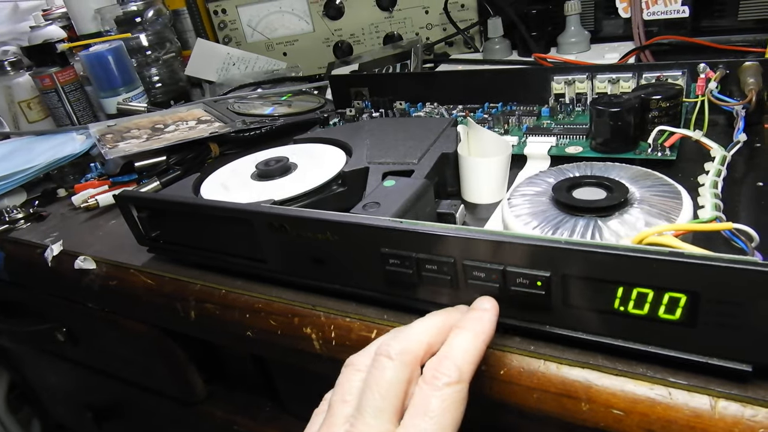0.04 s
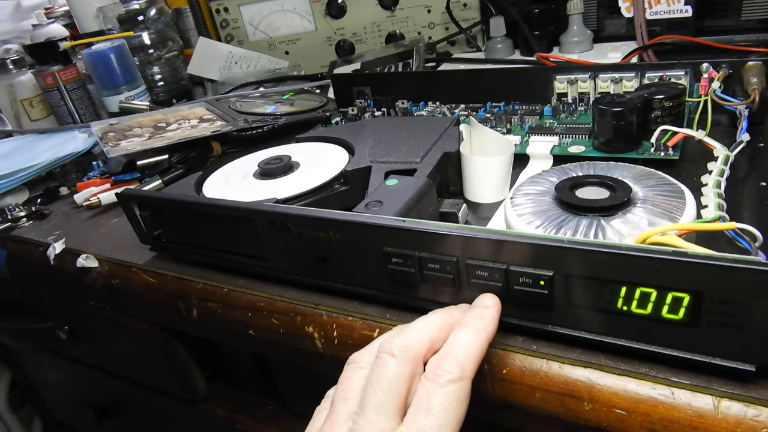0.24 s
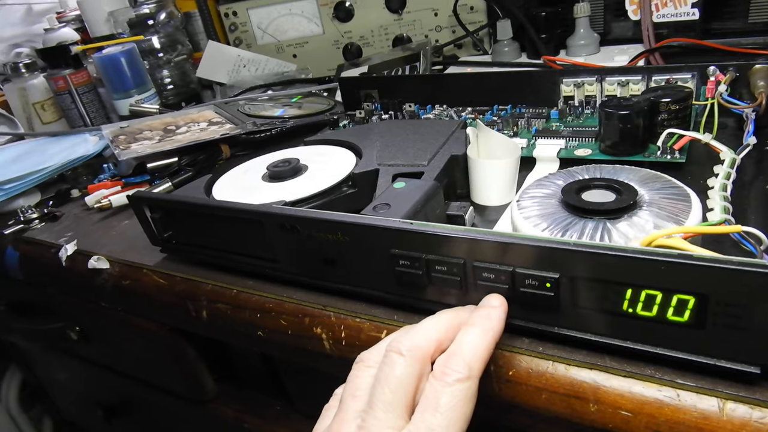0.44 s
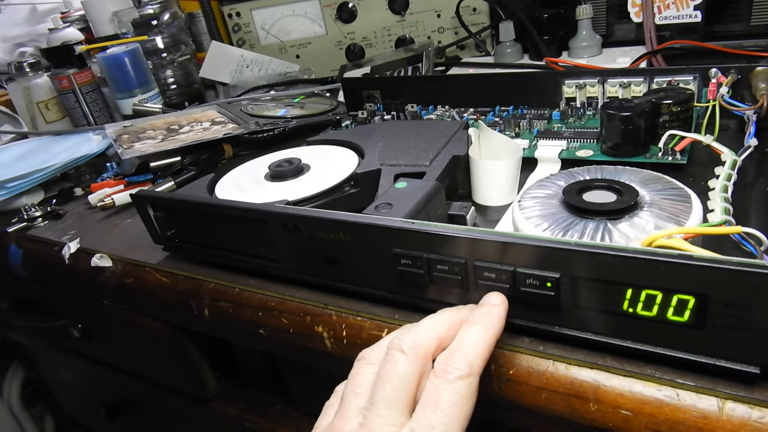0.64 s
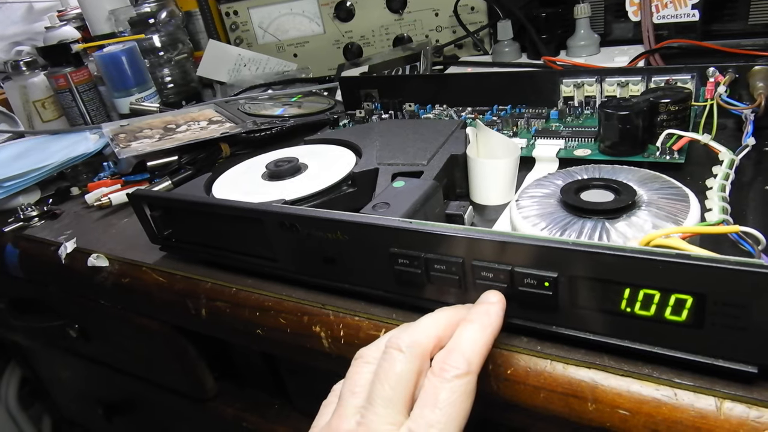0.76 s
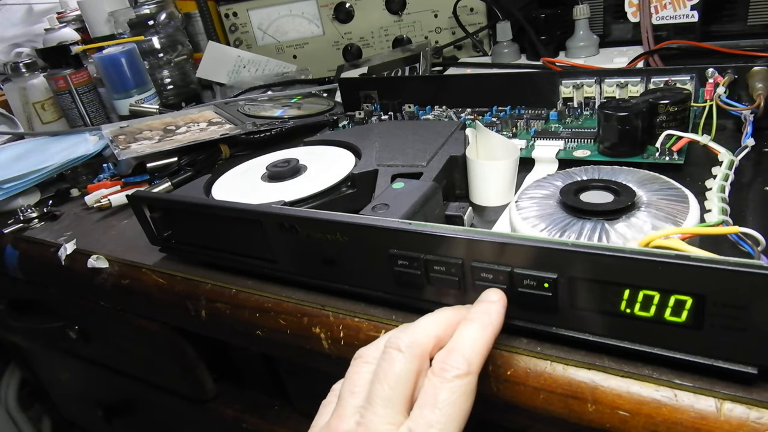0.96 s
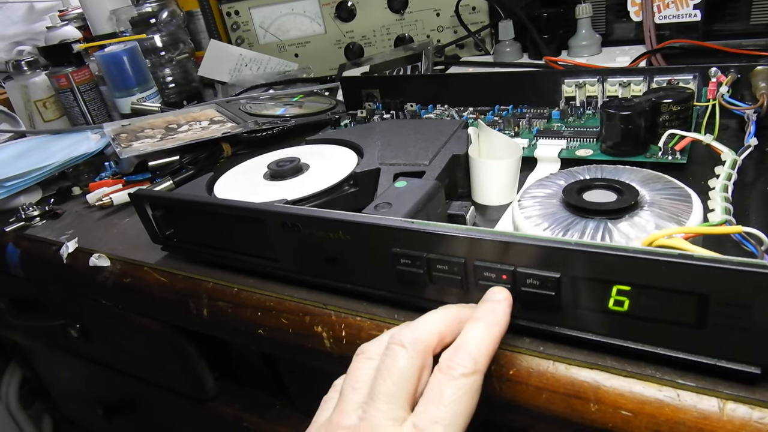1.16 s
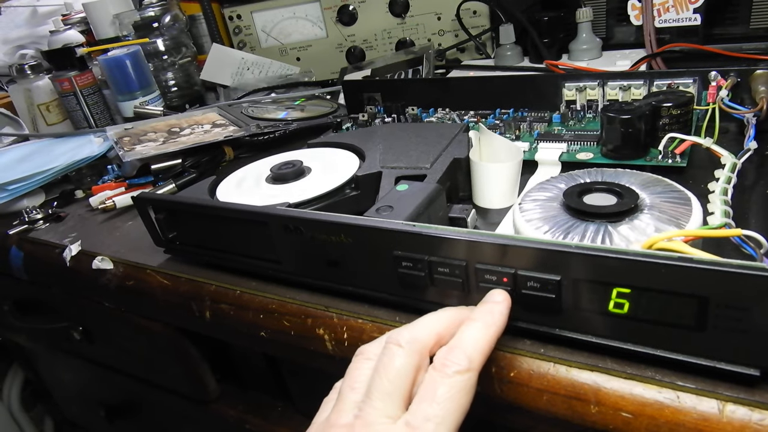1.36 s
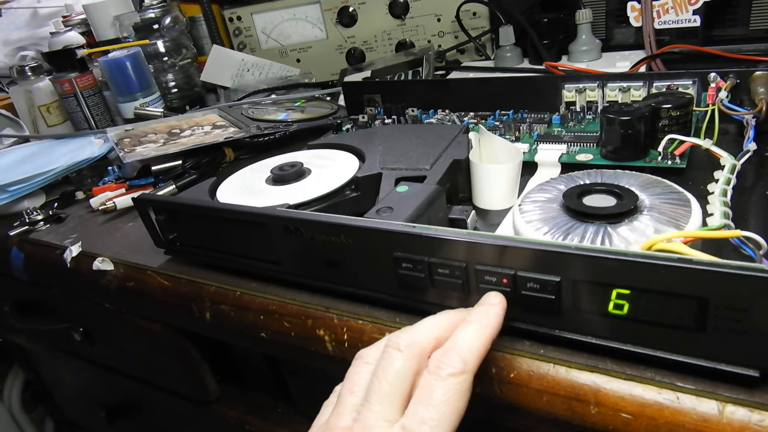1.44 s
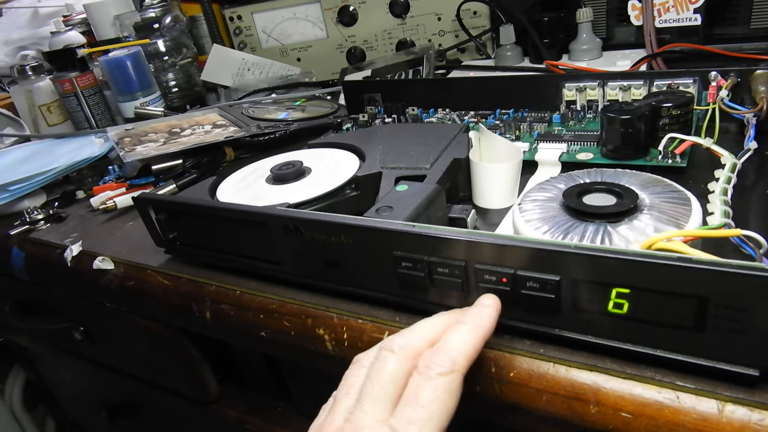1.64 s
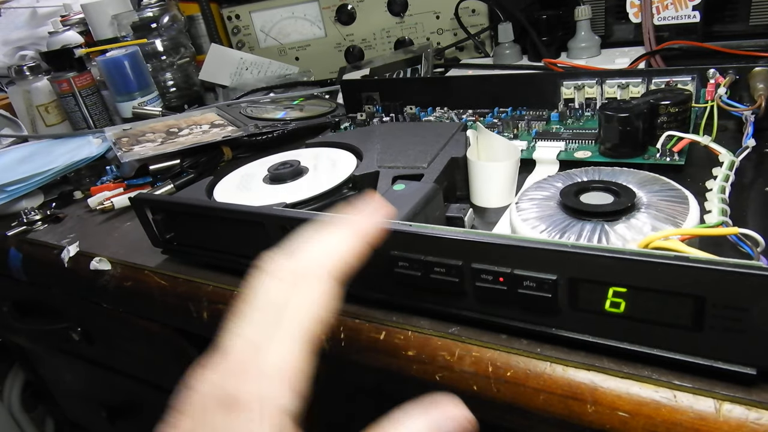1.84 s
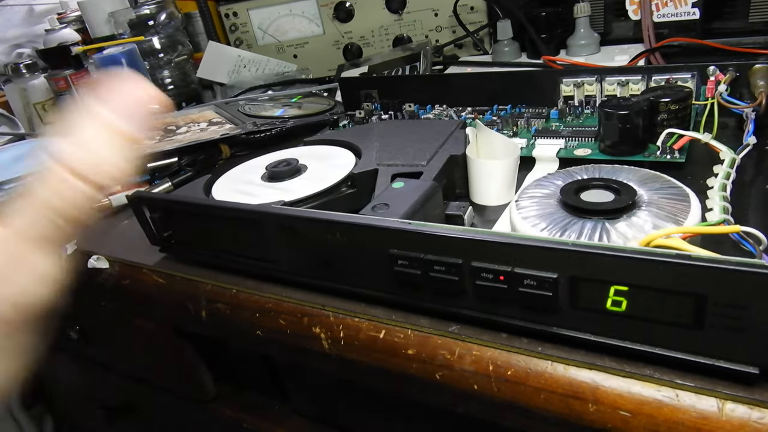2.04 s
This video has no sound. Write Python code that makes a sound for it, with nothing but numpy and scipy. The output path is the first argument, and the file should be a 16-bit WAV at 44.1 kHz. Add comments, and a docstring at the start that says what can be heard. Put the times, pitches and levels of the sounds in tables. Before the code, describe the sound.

Throbbing metallic hiss of a slipping disc, after soft scuffs and clicks, ending in a bench knock.

```python
"""Braked disc on a workbench

An open disc player: friction of the turning disc against its clamp gives soft scuffs, as shaped noise grains.
A focus servo adds a thin whine, a frequency-modulated sine in a noise skirt, until the stop key clicks.
The braked spindle then slips under the disc, a hiss of resonant friction throbbing with each slip turn.
The clamp clunks free and scrapes; a hand knocks the bench early and late, ringing decaying modes.
Reflections, room noise and a steady hum surround the player."""
import sys
import numpy as np
from scipy import signal
from scipy.fft import rfft, irfft
from scipy.io import wavfile
from scipy.ndimage import uniform_filter1d

SR = 44100
rng = np.random.default_rng(int(sys.argv[2]) if len(sys.argv) > 2 else 0)


def master_out(mix):
    """Clip the mix to full scale and print it as 16-bit PCM to the path in sys.argv[1]."""
    frames = np.transpose(np.atleast_2d(mix))
    ceiling = np.clip(frames, -1, 1)
    pcm = np.round(ceiling * 32767).astype(np.int16)
    wavfile.write(sys.argv[1], SR, pcm)


N = 92742


def amp(db):
    """Amplitude ratio from the logarithmic decibel law."""
    return 10 ** (np.asarray(db) / 20)


def evened(x):
    """Normalisation to unit root-mean-square."""
    return x / np.sqrt(np.mean(x ** 2) + 1e-20)


def smooth_noise(seconds):
    """Moving average of white noise: a slow random fluctuation of unit rms."""
    return evened(uniform_filter1d(rng.standard_normal(N), max(int(seconds * SR), 2)))


def read(points, hz):
    """Interpolation of a spectrum on a logarithmic frequency axis."""
    f, value = np.transpose(points)
    return np.interp(np.log(hz + 1), np.log(f + 1), value)


def curve(rows, col=1, outside=-120):
    """Linear interpolation in time of one table column, with a fixed value outside the table."""
    rows = np.asarray(rows)
    return np.interp(np.arange(N) / SR, rows[:, 0], rows[:, col], outside, outside)


def colour(x, gain):
    """Minimum-phase filtering: the folded cepstrum makes a magnitude gain(hz) causal."""
    hz = np.fft.rfftfreq(8192, 1 / SR)
    cepstrum = irfft(np.log(gain(hz) + 1e-5))
    cepstrum[1:4096] *= 2
    cepstrum[4097:] = 0
    impulse_response = irfft(np.exp(rfft(cepstrum)))[:4096]
    return signal.oaconvolve(x, impulse_response)[:len(x)]


def high_pass(hz, edge_hz):
    """Fourth-order magnitude roll-off below an edge."""
    return hz ** 4 / (hz ** 4 + edge_hz ** 4)


def rings(hz, modes):
    """Resonance: the powers of single-mode response curves add."""
    return np.sqrt(sum(amp(db) ** 2 / (1 + (2 * (hz - f) / w) ** 2) for f, w, db in modes))


def add(mix, s, sound):
    """Superposition of a sound onto the mix from a given second."""
    part = mix[round(s * SR):][:len(sound)]
    part += sound[:len(part)]


def blows(rows, modes, rise_s):
    """Modal impact: each blow swells softly into modes that die away exponentially."""
    out, t = np.zeros(N), np.arange(6000) / SR
    for s, peak_db, spot in rows:
        ring = 0
        for hz, db, t60, lag in modes:
            u = np.maximum(t - lag, 0)
            rise = np.sin(np.pi / 2 * np.minimum(u / rise_s, 1)) ** 2
            decay = amp(db - 60 * np.maximum(u - rise_s, 0) / t60)
            ring = ring + decay * rise * np.sin(2 * np.pi * hz * spot * u)
        add(out, s, amp(peak_db) * ring / abs(ring).max())
    return out


def friction(flutter_s=0.009, flutter_db=2.5):
    """Stick-slip friction: sparse grains of uneven size whose strength flutters within milliseconds."""
    grains_per_s, grain_spread_db = 20000, 1.5
    unevenness = np.minimum(rng.exponential(1, N), 5)
    size = amp(grain_spread_db * unevenness) * rng.standard_normal(N)
    slipping = rng.random(N) < grains_per_s / SR
    flutter = np.minimum(smooth_noise(flutter_s), 2)
    return size * slipping * amp(flutter_db * flutter)


def streaked(x, depth_db=3, width_hz=250, length_s=.04):
    """Time-frequency modulation: random gain patches, narrow in pitch and drawn out in time."""
    window, hop = 512, 128  # samples
    z = signal.stft(x, SR, nperseg=window, noverlap=window - hop)[2]
    patches = uniform_filter1d(rng.standard_normal(z.shape), max(int(width_hz * window / SR), 1), axis=0)
    patches = evened(uniform_filter1d(patches, max(int(length_s * SR / hop), 2), axis=1))
    gain = amp(depth_db * np.clip(patches, -3, 2))
    return signal.istft(z * gain, SR, nperseg=window, noverlap=window - hop)[1][:N]


def rubbed(shape, sled_db):
    """Source-filter principle: friction excites disc, sled and transport rings, each band with its own slips."""
    # Edges between independently excited disc bands: [Hz]
    splits_hz = [4000, 5300, 7100, 8600, 10500]
    # Rings of the disc: (frequency [Hz], width [Hz])
    disc_rings = [(2215, 15), (3373, 250), (3716, 16), (5400, 39), (5730, 130), (6380, 185), (6110, 19),
                  (6690, 9.9), (8110, 43), (8390, 60), (8980, 50), (9530, 22)]
    # Rings of the sled: (frequency [Hz], nominal width [Hz], relative level [dB])
    sled_rings = [(1301, 110, -1), (1636, 294, -1), (3380, 50, -3.5)]
    # Rings of the transport body: (frequency [Hz], nominal width [Hz], relative level [dB])
    body_rings = [(546.8, 29.4, 3.5), (610.6, 93, 0), (814, 59, -8)]
    disc_lift_db = 4.5
    pulse = 0.03, 2.5  # the low rings come in slower pulses: (s, dB)

    def disc_gain(hz):
        lift = rings(hz, [(f, w, disc_lift_db) for f, w in disc_rings])
        return amp(read(shape, hz)) * np.sqrt(1 + lift ** 2) * high_pass(hz, 1750.0)

    def power_above(hz, edge):
        return hz ** 12 / (hz ** 12 + edge ** 12.)

    def band_gain(hz, lo, hi):
        return disc_gain(hz) * np.sqrt(abs(power_above(hz, lo) - power_above(hz, hi)))

    bands = [colour(evened(friction()), lambda hz: band_gain(hz, lo, hi))
             for lo, hi in zip([1.] + splits_hz, splits_hz + [SR])]
    scale = np.sqrt(np.mean(sum(bands) ** 2))
    dull, low, high = bands[0] / scale, sum(bands[1:3]) / scale, sum(bands[3:]) / scale
    # The exponents sharpen the resonances
    sled = evened(colour(friction(*pulse), lambda hz: rings(hz, sled_rings) ** 1.35))
    body = evened(colour(friction(*pulse), lambda hz: rings(hz, body_rings) ** 1.92 * high_pass(hz, 730.0)))
    # Streaks in the dull band are thinner and longer
    dull = streaked(dull + amp(sled_db) * sled, depth_db=4, width_hz=120, length_s=.09)
    return dull, streaked(low), streaked(high), body


def graze():
    """Light sliding contact: changing pressure sets the level and brightness of soft scuffs."""
    # Spells of contact, each a list of
    # (time [s], level [dB], level of low body ring [dB], relative level of upper band [dB])
    contacts = [
        [(0.0, -37, -65, -3), (0.012, -37, -56, 8), (0.03, -44.5, -73, -8), (0.056, -34.5, -46, 2),
         (0.078, -34.5, -43.5, -2.5), (0.108, -36.5, -64, -2), (0.158, -31, -57, -3.5), (0.19, -31, -46, 0),
         (0.256, -46.5, -61, 2.5), (0.28, -33.5, -54.5, -1.5), (0.362, -40, -49, -9), (0.394, -33.5, -43, 0.5),
         (0.42, -35, -52, -3), (0.436, -30, -41, -9), (0.448, -34, -53, -5.5), (0.51, -47, -47.5, 0.5),
         (0.538, -48, -62, -6), (0.604, -36, -42, -7.5), (0.646, -65, -57.5, -20), (0.662, -52.5, -48.5, -5),
         (0.7, -64, -55, -10)],
        [(2.058, -48.5, -62, 1), (2.073, -37, -51, -7), (2.083, -39.5, -55, -2), (2.103, -41.5, -33.5, -9)],
        [(.775, -59, -65, -4), (.8, -49.5, -68, -8), (.84, -60, -57.5, -6), (.851, -35.5, -48, -6),
         (.875, -51.5, -60, -20), (.892, -48, -54, -4), (.91, -90, -78, -13), (.95, -43, -54, -17),
         (.99, -66, -53, -12), (1.02, -79, -67, -4), (1.1, -81, -78, -8), (1.16, -45.5, -78, -15)],
    ]
    # Friction spectrum: (frequency [Hz], relative density [dB per Hz])
    graze_colour = [(1060, -68), (1800, -5), (2540, -3.5), (2700, -5), (3420, -3.5), (3940, -8.5),
                    (4190, 0.5), (4540, -3.5), (5500, 0.5), (6920, -2.5), (9010, 0.5), (11900, -26.5),
                    (14100, -45), (14800, -38)]
    lower_band_db, sled_db = -2.15, -12
    dull, low, high, body = rubbed(graze_colour, sled_db)
    lower = amp(lower_band_db) * (dull + low)
    high = evened(high)
    out = np.zeros(N)
    for rows in contacts:
        out += amp(curve(rows)) * (lower + amp(curve(rows, col=3)) * high)
        out += amp(curve(rows, col=2)) * body
    return out


def whine():
    """Frequency modulation: the focus servo sings a wavering line in a fuzzy resonant skirt."""
    # Level of the whine: (time [s], level before fluctuation [dB])
    whine_level = [(0, -58), (.45, -54), (.58, -58), (.64, -64), (.7, -59), (.85, -57), (.905, -61),
                   (.965, -54), (1.03, -60), (1.09, -57), (1.168, -55)]
    pitch_hz, wander_hz, wander_s = 5075, 70, .004
    bead_s, bead_db = .008, 3.5  # quick unevenness of level
    modes = [(pitch_hz, 95, 0), (pitch_hz, 350, -5)]  # core and skirt: (Hz, nominal width Hz, dB)
    beads, wander = smooth_noise(bead_s), smooth_noise(wander_s)
    phase = 2 * np.pi * np.cumsum(pitch_hz + wander_hz * wander) / SR
    line = np.sqrt(2) * np.sin(phase)
    fuzz = evened(colour(rng.standard_normal(N), lambda hz: rings(hz, modes) ** 2))
    return amp(curve(whine_level) + bead_db * beads) * (line + fuzz)


def air():
    """Partial coherence: room noise is less alike left and right as pitch rises; steady hum is common to both."""
    # Room noise spectrum: (frequency [Hz], relative density [dB per Hz])
    air_colour = [(18, -70), (30, -6), (50, 0), (126, 4), (286, 2), (345, -5.5), (454, -4.5), (801, -6),
                  (948, 0), (1120, -8), (1820, -9.5), (3970, -16), (4600, -8), (5500, -12.5), (6500, -11.5),
                  (8500, -11.5), (10000, -15.5), (15000, -33)]
    # Likeness of the two channels: (frequency [Hz], left-right coherence [0 to 1])
    likeness = [(60, 0.78), (290, 0.51), (700, 0.33), (6500, 0.21), (14000, 0.13)]
    # Mains hum: (frequency [Hz], rms level ahead of stereo balance [dB])
    hum_lines = [(90, -63.5), (150, -66.5), (300, -62.5)]
    air_db = -52
    a, b = rfft(rng.standard_normal((2, N)))
    hz, t = np.fft.rfftfreq(N, 1 / SR), np.arange(N) / SR
    same = np.clip(read(likeness, hz), 0, 1)
    spectra = np.array([a, same * a + np.sqrt(1 - same ** 2) * b])
    pair = irfft(spectra * amp(read(air_colour, hz)), N)
    hum = sum(np.sqrt(2) * amp(db) * np.sin(2 * np.pi * (f * t + rng.random())) for f, db in hum_lines)
    return amp(air_db) * evened(pair) + hum


def knocks():
    """Modal impact: dull blows of flesh ring the wooden bench."""
    # Blows: (time [s], peak ahead of stereo balance [dB], pitch of the struck spot relative to the modes [ratio])
    knock_rows = [(0.1805, -28.5, 1.05), (0.196, -32.5, 1.25), (0.207, -36, 0.81), (2.048, -35, 0.89),
                  (2.0552, -16, 0.93), (2.066, -29, 1.11), (2.078, -32, 1.9), (2.087, -33.5, 1.15),
                  (2.093, -23.5, 0.87)]
    # Bench modes, higher ones speaking later: (frequency [Hz], relative level [dB], T60 [s], lag [s])
    bench_modes = [(272, 13, 0.019, 0.00017), (588, 13, 0.016, 0.00205), (1087, 0, 0.034, 0.00385)]
    return blows(knock_rows, bench_modes, rise_s=0.0067)


def ticks():
    """Damped resonance: key and mechanism give short noisy rattles, each around its own pitch."""
    # Rattles: (time [s], level at onset before the rise [dB], pitch [Hz], nominal width [Hz], T60 [s])
    tick_rows = [(.662, -46, 7900, 1200, 0.033), (0.705, -34, 5450, 1200, 0.039),
                 (0.953, -32.5, 8130, 1500, 0.03), (0.982, -33.5, 6540, 2000, 0.033),
                 (1.103, -47, 1500, 500, 0.052), (1.149, -37.5, 1490, 700, 0.055),
                 (1.171, -28, 3500, 5000, 0.048), (1.171, -32.5, 7800, 3980, 0.023),
                 (1.204, -37.5, 1700, 1880, 0.058), (1.556, -13.5, 8330, 1200, 0.045),
                 (2.01, -36.5, 8000, 1200, 0.01)]
    rise_s = 0.0017
    out, t = np.zeros(N), np.arange(4000) / SR
    for s, db, hz, width, t60 in tick_rows:
        noise = rng.standard_normal(len(t))
        tone = evened(colour(noise, lambda f: rings(f, [(hz, width, 0)]) ** 3))
        rise = np.minimum(t / rise_s, 1) ** 2
        add(out, s, amp(db - 60 * t / t60) * rise * tone)
    return out


def slip():
    """Periodic modulation: the spindle's uneven face throbs the friction once, twice and thrice a turn."""
    # Level following contact pressure: (time [s], level before throbbing [dB])
    pressure = [(1.19, -55), (1.202, -41), (1.21, -25), (1.22, -32), (1.234, -26.5), (1.246, -27),
                (1.265, -22.5), (1.55, -23), (1.862, -22.5), (1.885, -28), (1.92, -75), (1.99, -70)]
    # Friction spectrum: (frequency [Hz], relative density [dB per Hz])
    slip_colour = [(1060, -77), (1800, -26.5), (2240, -18.5), (2670, -23), (3330, -17.5), (3970, -22.5),
                   (4190, -13), (5500, -7), (7100, -7), (8250, 0), (9500, -3.5), (12400, -31),
                   (13600, -34.5), (14800, -73)]
    # Rate of slip: (time [s], slip turns per second [1/s])
    slip_rate = [(1.2, 12.96), (1.5, 14.4), (1.9, 14.96)]
    # Uneven clamp face: (cycles per turn, lower band depth [dB], its lag [turns],
    # upper band depth [dB], its lag [turns])
    uneven = [(1, 4, 0.0025, 3, -0.11), (2, 1.7, 0.0065, 0.8, 0.093), (3, -0.5, 0.0085, 3, -0.000083)]
    body_db, sled_db, dull_throb = -26.5, -28, 0.35  # dull_throb: share of the lower band's dB swing
    held_rate = [(0, slip_rate[0][1])] + slip_rate + [(3, slip_rate[-1][1])]
    turns = np.cumsum(curve(held_rate)) / SR
    turns = turns - turns[round(1.296 * SR)]  # turns are counted from 1.296 s
    dull, low, high, body = rubbed(slip_colour, sled_db)
    low_db = sum(a * np.cos(2 * np.pi * k * (turns - lag)) for k, a, lag, _, _ in uneven)
    high_db = sum(a * np.cos(2 * np.pi * k * (turns - lag)) for k, _, _, a, lag in uneven)
    dull_part = amp(dull_throb * low_db) * (dull + amp(body_db) * body)
    return amp(curve(pressure)) * (amp(low_db) * low + amp(high_db) * high + dull_part)


def settle():
    """Impact and friction: the clamp clunks free as the mechanism scrapes dully to rest."""
    # Level of the scrape: (time [s], level [dB])
    scrape_level = [(1.885, -50), (1.905, -52), (1.93, -43), (1.965, -47), (1.99, -78)]
    # Rings of the scraping mechanism: (frequency [Hz], width [Hz], relative level [dB])
    scrape_rings = [(457, 54, 2), (595, 91, -6), (850, 54, 4), (1416, 130, 0), (1990, 160, -9),
                    (3260, 590, -5.5)]
    # Clunks of the clamp: (time [s], peak ahead of stereo balance [dB], pitch relative to the modes [ratio])
    clunk_rows = [(1.893, -28, 1.01), (1.9035, -33, 1.36)]
    # Clamp modes: (frequency [Hz], relative level [dB], T60 [s], lag [s])
    clamp_modes = [(435, 0, .05, 0), (870, -9, .028, 0), (1330, -16, .06, 0)]
    scrape = evened(colour(friction(), lambda hz: rings(hz, scrape_rings)))
    return amp(curve(scrape_level)) * scrape + blows(clunk_rows, clamp_modes, rise_s=0.00176)


def room(x):
    """Reverberation: sparse decaying reflections from bench and shelves, different at each microphone."""
    # Reflected share: (frequency [Hz], gain [dB])
    reflected = [(100, 6), (300, -16.5), (600, -6), (1500, -2.5), (4000, -2.5), (8000, -4), (13000, 1.5)]
    t60_s = 0.17
    t = np.arange(12000) / SR
    present = (rng.random((2, len(t))) < .05) * (t > .001)
    taps = rng.standard_normal((2, len(t))) * present * amp(-60 * t / t60_s)
    taps = taps / np.linalg.norm(taps, axis=1)[:, None]
    wet = colour(x, lambda hz: amp(read(reflected, hz)))
    return signal.fftconvolve(wet[None], taps, axes=1)[:, :N]


def scene():
    """Superposition of all sources, with level differences placing them left or right."""
    # Stereo balance of all but the direct knocks: (frequency [Hz], left minus right [dB])
    left_lean = [(60, 1.5), (400, 2), (1500, 1.5), (2500, 0.5), (8000, 3), (13000, .6)]
    knock_left_db = 7  # left minus right
    side = np.array([[.5], [-.5]])
    player = graze() + whine() + ticks() + slip() + settle()
    bench = knocks()
    around = rfft(player + room(player + bench) + air())
    balance = amp(read(left_lean, np.fft.rfftfreq(N, 1 / SR)) * side)
    return irfft(around * balance, N) + bench * amp(knock_left_db * side)


def record(dry):
    """Band limitation: a linear-phase low-pass filter removes the highest treble."""
    edge_hz = 15700
    low_pass = signal.firwin(511, edge_hz, window=("kaiser", 9), fs=SR)
    return signal.oaconvolve(dry, low_pass[None], "same")


dry = scene()
out = record(dry)
master_out(out)
```